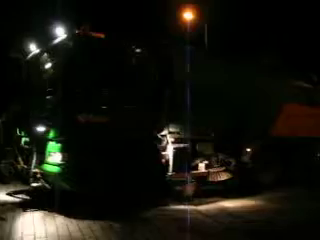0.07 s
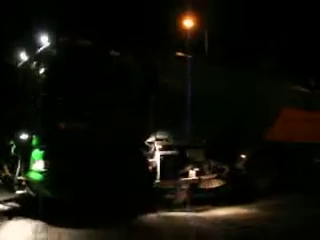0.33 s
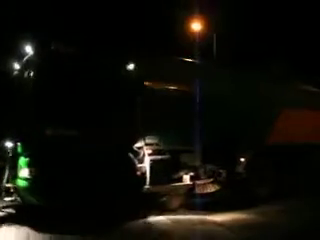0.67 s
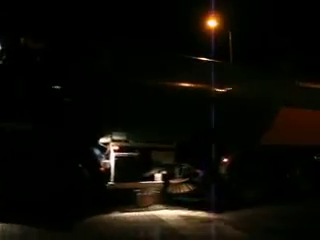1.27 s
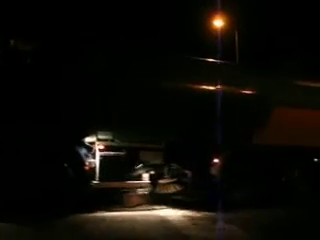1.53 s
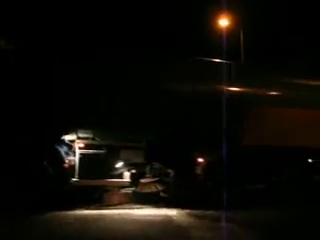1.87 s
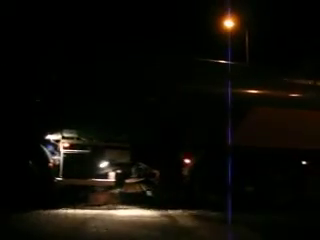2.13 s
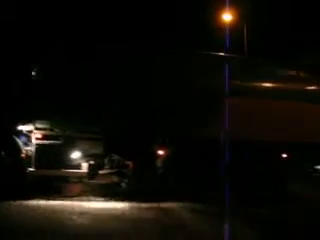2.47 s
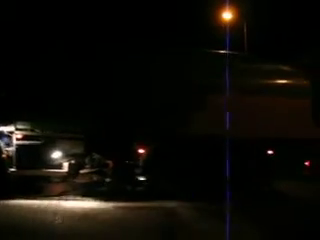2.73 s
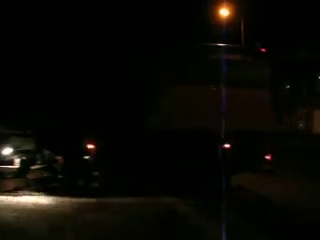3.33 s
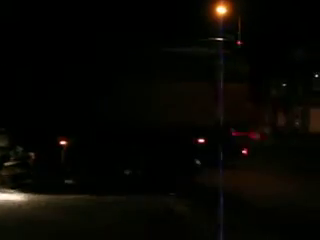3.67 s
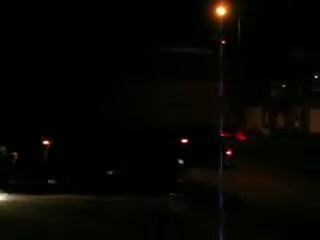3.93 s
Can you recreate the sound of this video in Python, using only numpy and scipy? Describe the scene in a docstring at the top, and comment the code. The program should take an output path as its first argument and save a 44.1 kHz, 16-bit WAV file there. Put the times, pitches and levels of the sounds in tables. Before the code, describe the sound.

A large road work machine passes close by, diesel booming, fan whining and gear hissing.

```python
"""A night street, a small microphone close to a large road work machine passing at a steady engine speed.
From the start its diesel booms through the exhaust over a shaft's hum, a fan whines over the roar of
cooling air, and the working gear hisses and rattles with grit. The side panels drone as they pass, then
the housing swells and scraped steel rings. Towards the end a rush opens up as the machine's side goes by,
and the shaft's hum returns. Throughout, a limiter pushes the whole sound down at the loud peaks."""
import sys
import numpy as np
from scipy import signal
from scipy.fft import rfft, irfft
from scipy.io import wavfile
from scipy.ndimage import uniform_filter1d

SR = 44100
rng = np.random.default_rng(int(sys.argv[2]) if len(sys.argv) > 2 else 0)


def to_wav(s):
    """Save 16-bit WAV."""
    ch = np.atleast_2d(s).T  # columns
    pcm = np.round(np.clip(ch, -1, 1) * 32767)  # PCM
    wavfile.write(sys.argv[1], SR, pcm.astype(np.int16))


N = 176400
TIME = np.arange(N) / SR
CYCLE_HZ = 17.24  # the diesel's four-stroke cycles a second


def amp(db):
    """Decibels to gain."""
    return 10 ** (np.asarray(db) / 20)


def unit(x):
    """Scales to rms 1."""
    return x / np.sqrt(np.mean(x ** 2) + 1e-20)


def level(points):
    """Gain over time from (time [s], level [dB]) points."""
    return amp(np.interp(TIME, *np.transpose(points)))


def colour(x, spectrum):
    """Shapes x by (frequency [Hz], level [dB]) points, at rms 1."""
    points_hz, points_db = np.transpose(spectrum)
    hz = np.fft.rfftfreq(N, 1 / SR)
    gain = amp(np.interp(np.log(hz + 1), np.log(points_hz + 1), points_db))
    return unit(irfft(rfft(x) * gain, N))


def drift(rate_hz):
    """Slow random motion of rms 1, up to about the given rate."""
    hz = np.fft.rfftfreq(N, 1 / SR)
    lowpass = (hz > 0) / (1 + (hz / rate_hz) ** 4)
    return unit(irfft(rfft(rng.standard_normal(N)) * lowpass, N))


def resonate(x, hz, width_hz):
    """Passes x twice through one resonance for steep sides, at rms 1."""
    b, a = signal.iirpeak(hz, hz / width_hz, SR)
    return unit(signal.lfilter(b, a, signal.lfilter(b, a, x)))


def partial(turns, multiple):
    """A sine at a multiple of a rotation's rate, with a random phase, at rms 1."""
    return unit(np.sin(2 * np.pi * (multiple * turns + rng.random())))


def hum(turns, orders):
    """Low multiples of a shaft's rate, each wavering slightly in level."""
    return sum(amp(db + 2 * drift(rate_hz=7.2)) * partial(turns, multiple) for multiple, db in orders)


def chassis_rumble():
    """The chassis rumbles at a constant level under everything else."""
    # spectrum of the rumble (frequency [Hz], level [dB])
    spectrum = [(10, -27.5), (24, -16.5), (36, -4), (60, -4), (85, -5), (108, 1.5), (128, -4), (160, 1),
                (250, -1), (340, -5), (420, -3.5), (500, -12.5), (600, -36), (1200, -61.5)]
    return amp(-21.5) * colour(rng.standard_normal(N), spectrum)


def side_rush():
    """A midrange rush opens up as the machine's side goes by the microphone."""
    # spectrum of the rush (frequency [Hz], level [dB])
    spectrum = [(250, -24), (480, 0.5), (800, -2), (1100, -0.5), (1500, -4), (2000, -12.5), (4000, -42.5)]
    # rush at the microphone (time [s], level [dB])
    rush_level = [(.1, -46), (1.4, -44), (2.4, -36), (2.9, -33), (3.7, -29.5), (4, -36)]
    return level(rush_level) * colour(rng.standard_normal(N), spectrum)


def shaft_hum(clock, shaft_hz=21.44):
    """A second shaft hums, loud at first, then sinking away and returning near the end."""
    # the shaft's tones (multiple of its rate, level [dB])
    orders = [(2, -41.5), (3, -35.5)]
    # swell of those tones at the microphone (time [s], gain [dB])
    swell = [(.1, 12), (.35, 7.5), (.7, -1.5), (1.7, -5.5), (2.8, -6), (3.45, 4.5), (4, 5)]
    return level(swell) * hum(clock * shaft_hz, orders)


def cooling_roar():
    """The cooling air makes a broad, nearly even roar."""
    # spectrum of the air stream (frequency [Hz], level [dB])
    spectrum = [(300, -24), (520, -8), (610, 0.5), (710, -1.5), (810, 0.5), (920, -3), (1050, -6.5),
                (1250, -15.5), (1450, -20.5), (2200, -23.5), (5000, -61)]
    # roar at the microphone (time [s], level [dB])
    roar_level = [(.1, -23), (1.5, -24), (2.45, -23.5), (2.9, -23.5), (3.3, -21.5), (4, -26)]
    return level(roar_level) * colour(rng.standard_normal(N), spectrum)


def fan_whine(clock, blade_hz=378.4, waver_db=3, jitter_periods=0.044):
    """The fan's blade tone and its overtones waver in the air stream."""
    # blade tones (multiple of the blade rate, level at the start [dB], level at the end [dB])
    blade_tones = [(1, -29, -36.5), (2, -36, -33.5), (3, -51.5, -41.5)]
    turns = clock * blade_hz + jitter_periods * drift(rate_hz=18)
    whine = np.zeros(N)
    for multiple, start_db, end_db in blade_tones:
        gain = amp(np.linspace(start_db, end_db, N) + waver_db * drift(rate_hz=3))
        whine += gain * partial(turns, multiple)
    return whine


def grit(ticks_per_s=260, spread_db=3.5, decay_s=0.0052):
    """Grit strikes at random, each hit a short decaying tick of noise."""
    hits = rng.random(N) < ticks_per_s / SR
    strength = amp(spread_db * np.minimum(rng.exponential(1, N), 4))
    envelope = signal.lfilter([1], [1, -np.exp(-1 / (decay_s * SR))], hits * strength)
    return unit(envelope * rng.standard_normal(N))


def working_gear(puffs, pulsing=0.048, flutter_db=0.24):
    """The gear scrapes: a gritty hiss that pulses a little with the engine, and ringing steel parts."""
    # spectrum of the hiss and grit (frequency [Hz], level [dB])
    spectrum = [(600, -29.5), (1200, -9.5), (1380, -13.5), (1490, -4.5), (1590, -4.5), (1750, -0.5),
                (2050, -2.5), (2300, -2.5), (2750, -4.5), (3150, -4), (3850, -7), (4500, -12), (5050, -16),
                (5550, -22.5), (5950, -37.5), (6300, -55.5)]
    # hiss and grit at the microphone (time [s], level [dB])
    scrape_level = [(.1, -25.5), (.9, -26), (1.8, -25), (2.1, -23.5), (2.4, -26), (3, -25), (3.65, -24.5),
                    (3.9, -27)]
    # lower ring of the steel (time [s], level [dB])
    low_ring_level = [(.1, -42), (1.7, -42.5), (2.05, -36.5), (2.4, -38.5), (3.1, -34), (4, -38.5)]
    # higher ring of the steel (time [s], level [dB])
    high_ring_level = [(.1, -43.5), (2.3, -44.5), (2.7, -30.5), (2.95, -40.5), (4, -40)]
    ticks = amp(-10) * grit()
    hiss = unit((1 + pulsing * puffs) * rng.standard_normal(N))
    flutter = amp(flutter_db * drift(rate_hz=9.1))
    scrape = level(scrape_level) * colour(hiss + ticks, spectrum)
    low_ring = level(low_ring_level) * resonate(rng.standard_normal(N), hz=1765, width_hz=140)
    high_ring = level(high_ring_level) * resonate(rng.standard_normal(N), hz=2205, width_hz=140)
    return flutter * (scrape + low_ring + high_ring)


def firings(clock, scatter_db=2, decay_share=0.35):
    """Each firing is an uneven puff of pressure that decays over a share of the gap to the next."""
    # the six cylinders in firing order (strength [dB])
    cylinders = [1, -2, 2, 0.5, 0, -1.5]
    count = clock * CYCLE_HZ * len(cylinders)
    firing = count.astype(int)
    scatter = scatter_db * rng.standard_normal(N)[firing]
    strength = amp(np.array(cylinders)[firing % len(cylinders)] + scatter)
    return unit(strength * np.exp(-(count % 1) / decay_share))


def boom(puffs, hz, width_hz, gas_share=0.77):
    """Firing pulses and their turbulent gas ring one resonance of the machine."""
    pulses = resonate(puffs - puffs.mean(), hz, width_hz)
    gas = resonate(puffs * rng.standard_normal(N), hz, width_hz)
    return unit((1 - gas_share) * pulses + gas_share * gas)


def diesel(clock, puffs):
    """The diesel at close range: its firings ring the exhaust, housing and side panels over its hum."""
    # broad exhaust boom (time [s], level [dB])
    exhaust_level = [(.1, -26.5), (1.202, -21), (1.901, -22.5), (2.3, -27), (3, -27.5), (4, -28)]
    # drone of the housing (time [s], level [dB])
    housing_level = [(.1, -28.5), (1, -27.5), (1.5, -29), (2.1, -24), (2.43, -25), (2.57, -17.5),
                     (2.72, -27.5), (3.55, -27), (3.78, -24.5), (4, -28)]
    # narrow exhaust drone, strongest at first (time [s], level [dB])
    drone_level = [(.1, -19.5), (.7, -35), (1.6, -33.5), (2.1, -35), (4, -42)]
    # side panels droning as they pass the microphone (time [s], level [dB])
    panels_level = [(.1, -39), (1.2, -34.5), (1.7, -23.5), (1.999, -38.5), (4, -41.5)]
    # engine hum (multiple of the cycle rate, level [dB])
    orders = [(2, -43), (3, -38), (4, -38.5), (5, -34), (8, -35.5)]
    exhaust = level(exhaust_level) * boom(puffs, hz=176.9, width_hz=83)
    housing = level(housing_level) * boom(puffs, hz=289, width_hz=55)
    drone = level(drone_level) * boom(puffs, hz=191, width_hz=10)
    panels = level(panels_level) * boom(puffs, hz=362, width_hz=73)
    return exhaust + housing + drone + panels + hum(clock * CYCLE_HZ, orders)


def scene():
    """The machine as heard from the street, in mono; one speed drives the firings, the hums and the fan."""
    speed = 1 + 0.002 * drift(rate_hz=1.5)
    clock = np.cumsum(speed) / SR  # engine time [s]
    puffs = firings(clock)
    engine = diesel(clock, puffs) + shaft_hum(clock)
    noise_bed = chassis_rumble() + cooling_roar() + side_rush()
    return (engine + noise_bed + fan_whine(clock) + working_gear(puffs))[None]


def record(dry, start_s=0.072, drive_db=3, ceiling_db=-7.5, recover_db_per_s=57.5, cutoff_hz=6250):
    """The microphone cuts in; a limiter catches each peak and recovers quickly; the high treble is cut."""
    driven = dry[0] * amp(drive_db) * (TIME >= start_s)
    over_db = np.maximum(20 * np.log10(abs(driven) + 1e-9) - ceiling_db, 0)
    recovery_db = TIME * recover_db_per_s
    # the reduction jumps up at a peak, then falls back at the recovery rate
    reduction_db = np.maximum.accumulate(over_db + recovery_db) - recovery_db
    limited = driven / amp(uniform_filter1d(reduction_db, size=12))
    lowpass = signal.firwin(511, cutoff_hz, window=("kaiser", 9), fs=SR)
    return signal.oaconvolve(limited, lowpass, "same")[None]


dry = scene()
out = record(dry)
to_wav(out)
```